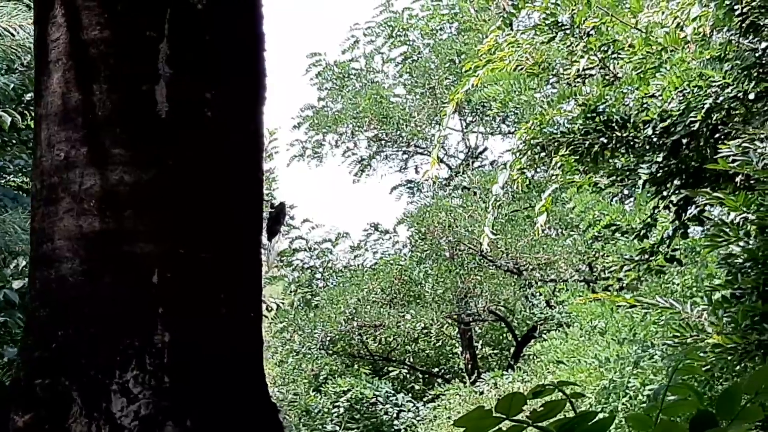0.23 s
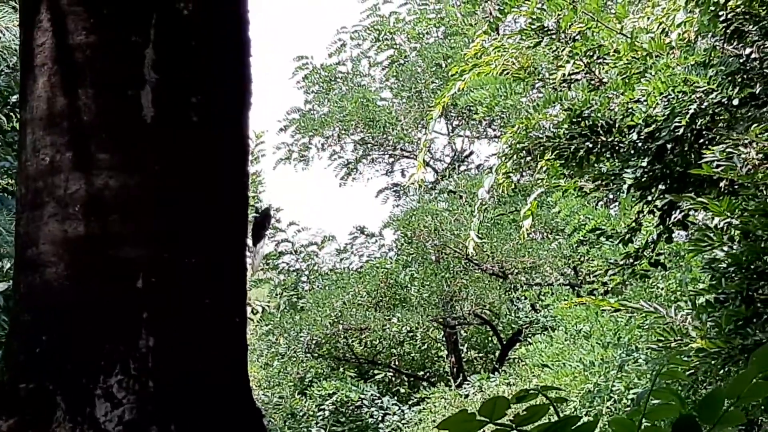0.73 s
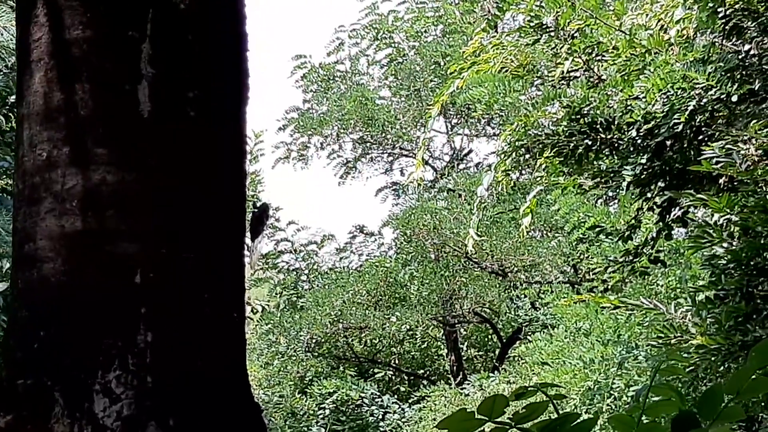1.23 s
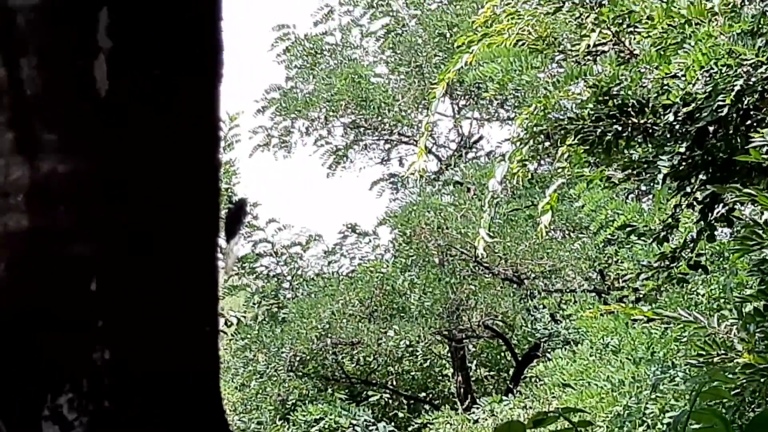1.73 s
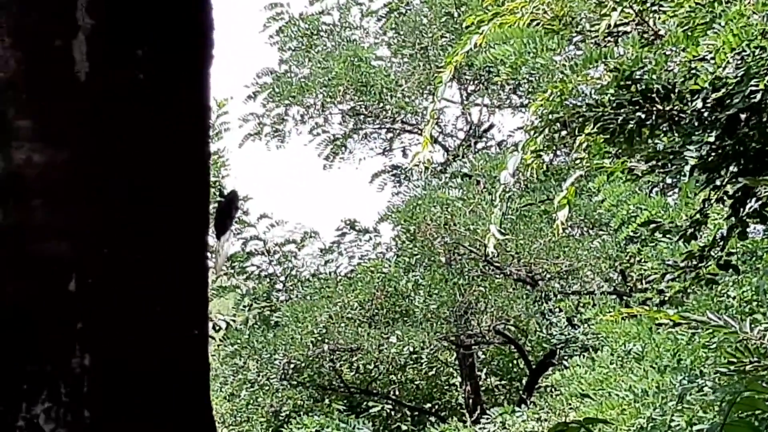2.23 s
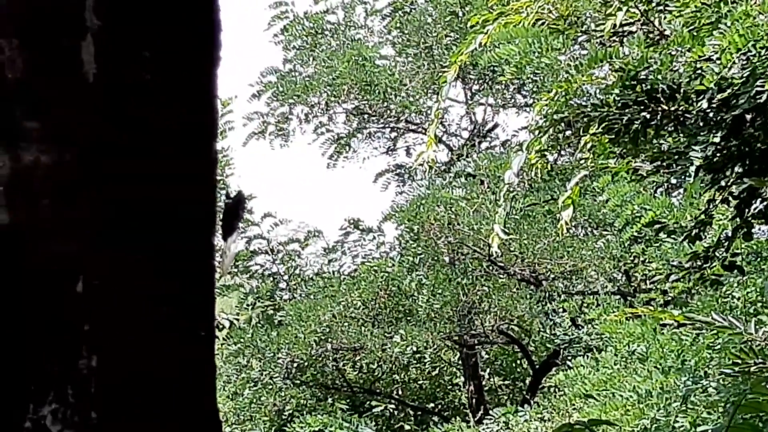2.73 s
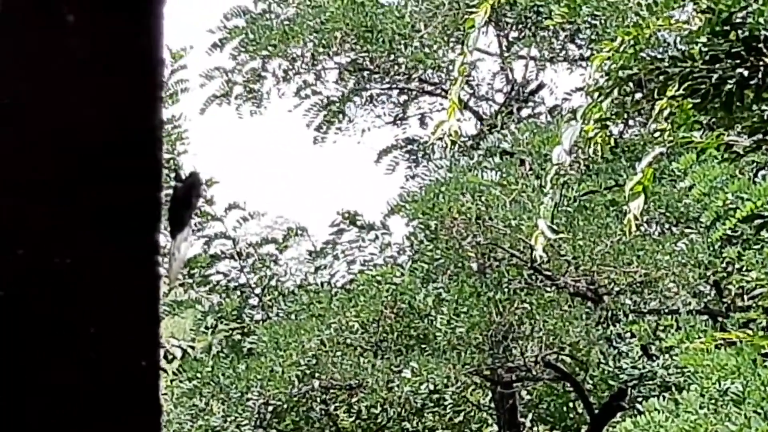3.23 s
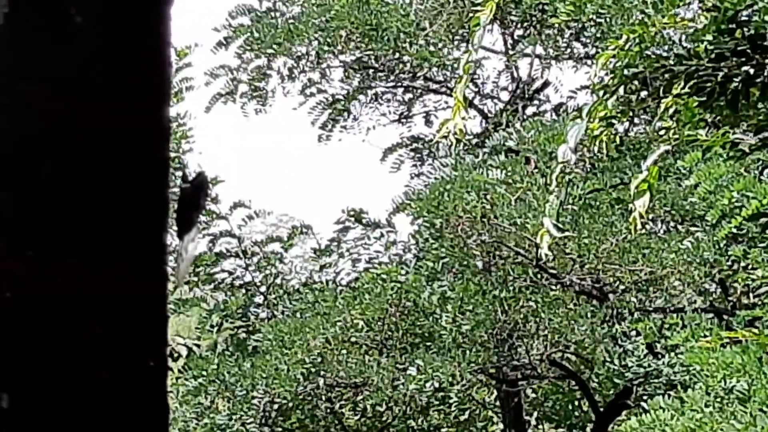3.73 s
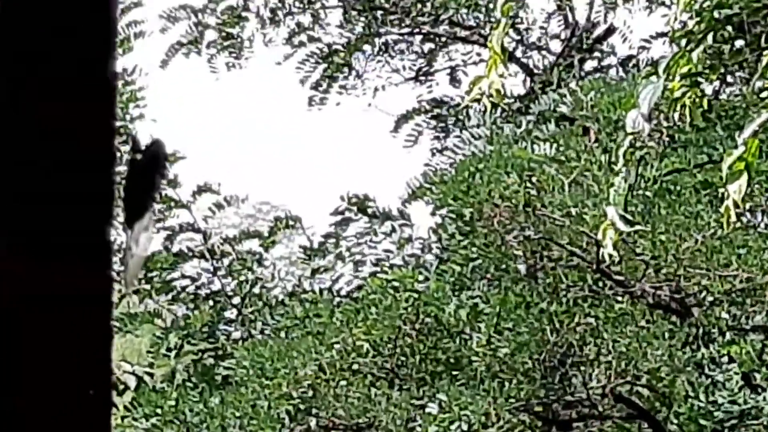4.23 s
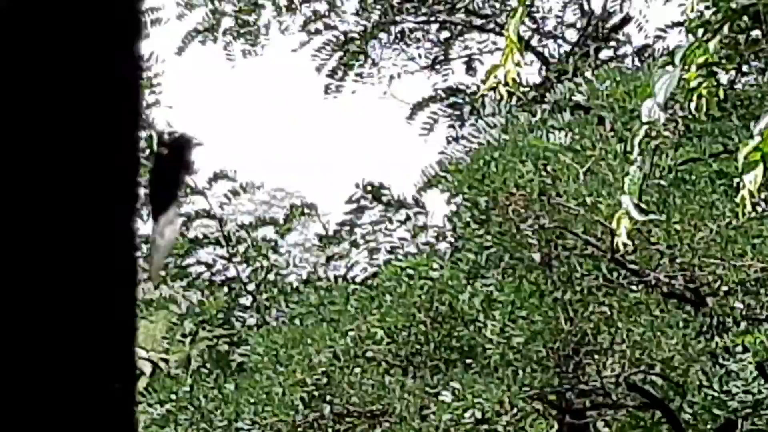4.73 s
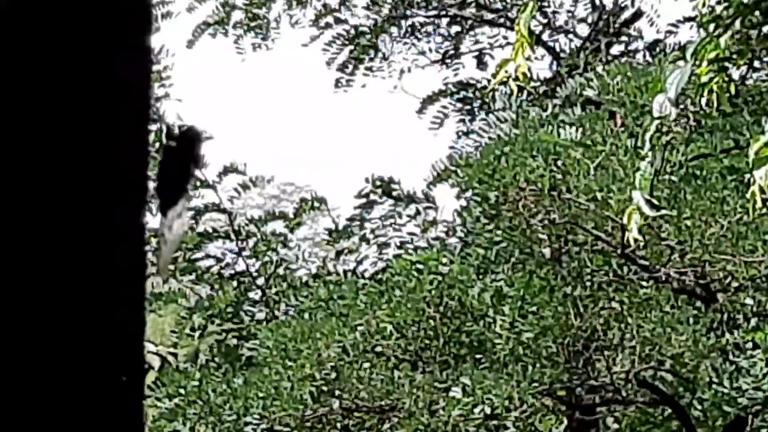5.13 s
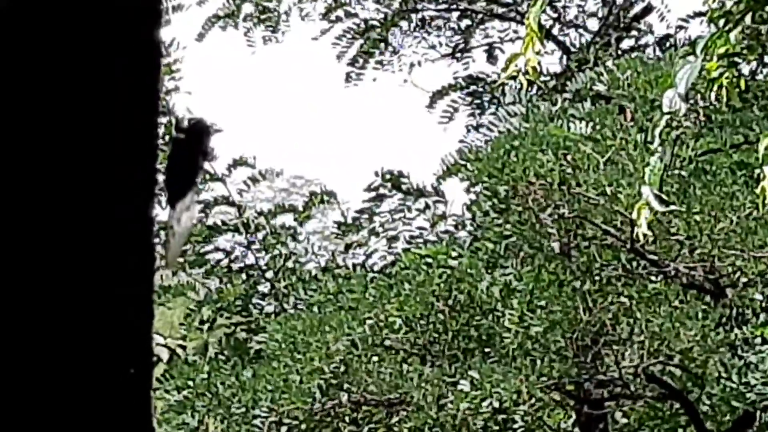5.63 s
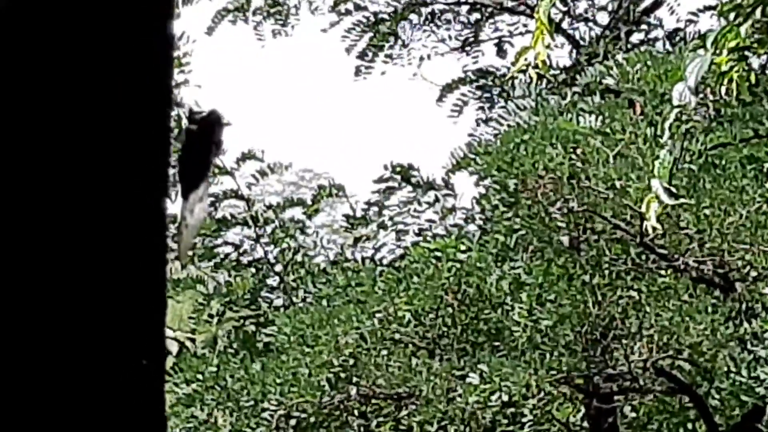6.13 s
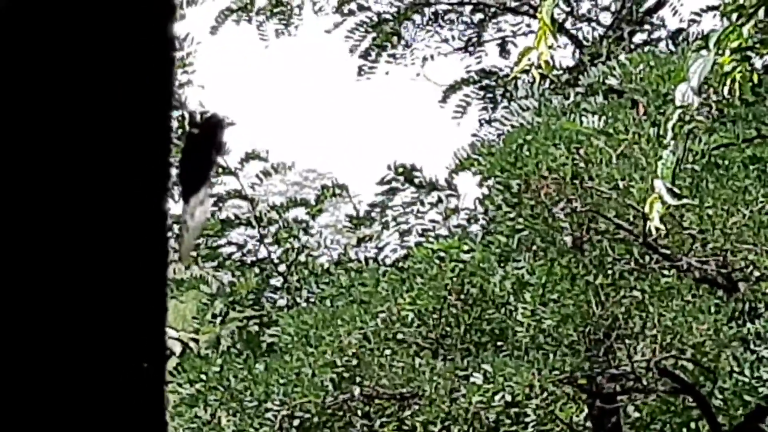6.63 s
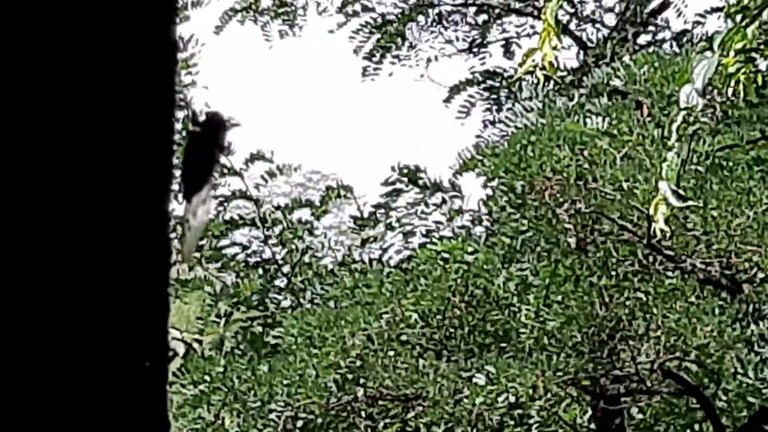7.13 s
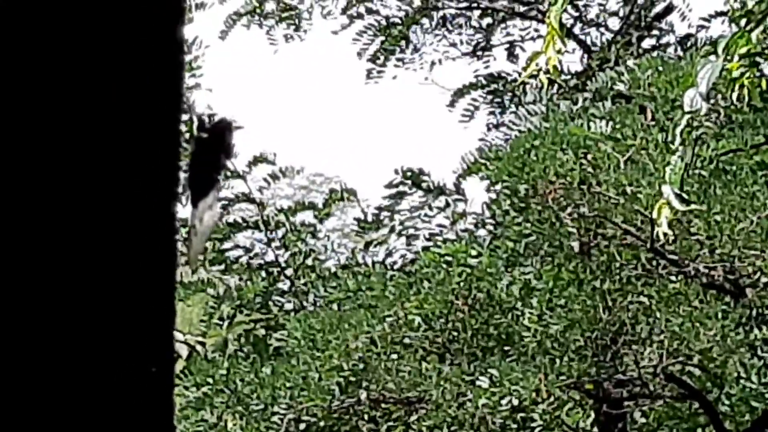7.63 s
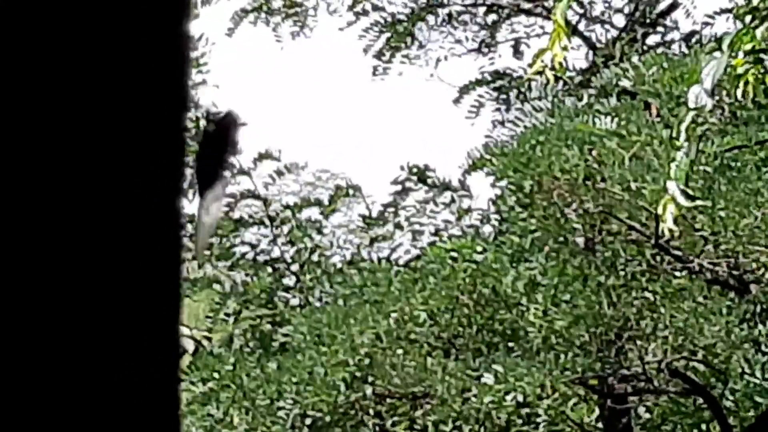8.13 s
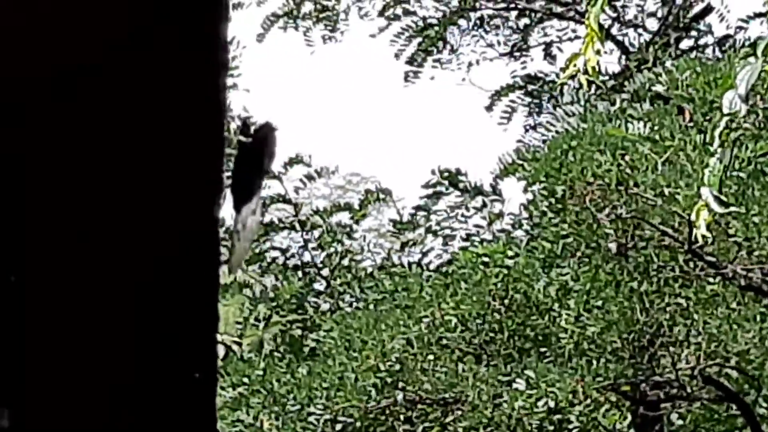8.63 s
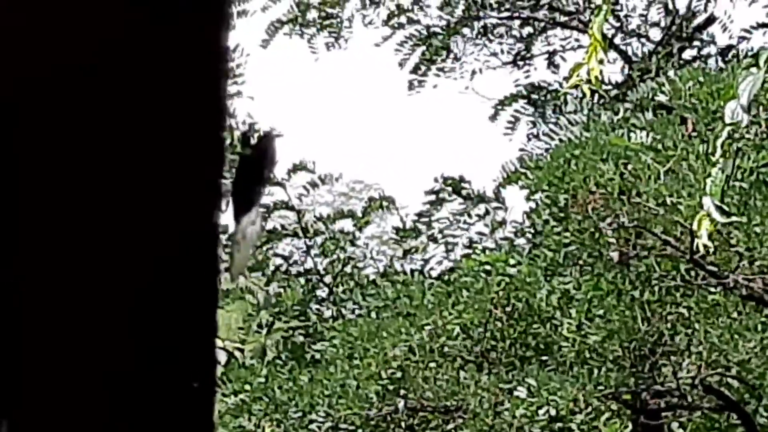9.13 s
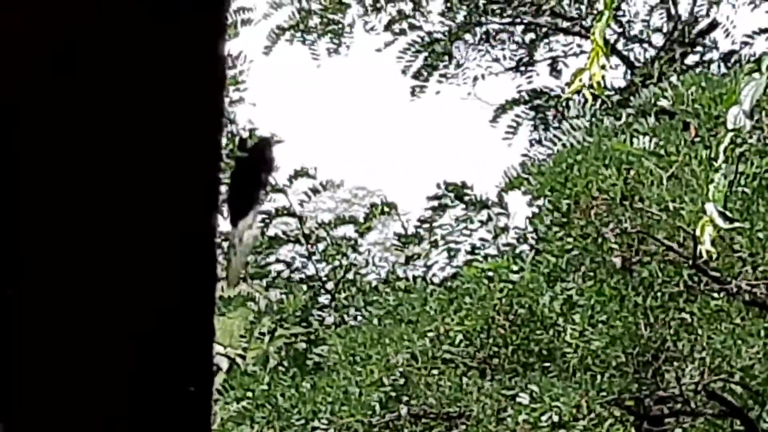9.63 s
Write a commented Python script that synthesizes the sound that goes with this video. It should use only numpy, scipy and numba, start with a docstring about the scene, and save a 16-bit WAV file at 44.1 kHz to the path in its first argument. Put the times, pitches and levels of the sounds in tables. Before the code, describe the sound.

Loud rhythmic cicada song from left, right and between, each pulse a hiss rising into a ringing buzz, over a grainy far chorus and faint rumble.

```python
"""Three cicadas sing 'min-min' close to the microphone: one left, one right, a fainter one between.
Each tymbal cycle clicks a few ribs; a shrill hiss builds, then the belly lifts and a lower ring swells.
Phrases of the left and right singers end in a slowing drawl, its clicks drifting apart.
Behind lie a far chorus of blurred clicks and noise, a faint rising bird call made of ringing noise,
town rumble of filtered noise, and a few soft low sine tones."""
import sys
import numpy as np
from scipy import signal
from scipy.fft import rfft, irfft
from scipy.io import wavfile
from scipy.ndimage import uniform_filter1d
from numba import njit

SR = 44100
rng = np.random.default_rng(int(sys.argv[2]) if len(sys.argv) > 2 else 0)


def amplitude_ratio(level_db):
    """Convert a level in decibels to the matching linear amplitude (field) ratio."""
    exponent = np.asarray(level_db, float) / 20
    return 10 ** exponent


def put_to_file(sound):
    """Save the sound as 16-bit audio at rate SR, in the file named by the first command-line argument."""
    columns = np.atleast_2d(sound).T  # one column per channel
    safe = np.clip(columns, -1, 1)
    whole_steps = np.round(safe * 32767)
    wavfile.write(sys.argv[1], SR, whole_steps.astype(np.int16))


N = 436590
T = np.arange(N) / SR

# syllables of the left singer: lift_s, ring_db, shrill_db (height of the build-up before it), cycle_hz
LEFT_SYLLABLES = [(1.213, -38, -43, 181.7), (1.559, -36.5, -42, 175.7), (1.949, -31.5, -40.5, 181),
                  (2.363, -31.5, -41, 182.1), (2.763, -30, -37, 184), (3.163, -29, -34.5, 184.7),
                  (3.55, -28.5, -32.5, 184.2), (3.948, -29.5, -32.5, 185.8), (4.316, -29, -30.5, 182.4),
                  (4.69, -33.5, -33, 179.3), (8.198, -33, -61, 179), (8.631, -29, -50, 184.5),
                  (9.017, -28, -40.5, 183.7), (9.395, -29, -34, 183.6), (9.755, -27.5, -30.5, 185.6)]
# slowing ends of its phrases: start_s, length_s, first_cycle_hz, last_cycle_hz, ring_db (at the start)
LEFT_DRAWLS = [(4.861, 1.5, 168.3, 79.96, -40.5)]
# shrill spectrum of the left and middle singers: frequency_hz, relative_db_per_hz
SHRILL = [(8000, -38), (9200, -31), (10500, -24), (11900, -9), (13000, -1.5), (13600, 0), (14600, -2),
          (15700, -1)]


def left_cicada():
    """The close singer on the left, with even clicks and its shrill well to the side."""
    low, high = cicada(LEFT_SYLLABLES, LEFT_DRAWLS, SHRILL, belly=.99, lift_s=.145, bend_depth=.22,
                       slip_us=.62, weak_slip_us=12.9, scatter_db=.89, late=.024)
    low = ports(low, lag=-11, pan_db=1.5, scatter_db=-2.5, t60=.037)
    return low + ports(high, lag=-11, pan_db=7.5, scatter_db=6, t60=.036, turns_hz=1.3)


# syllables of the right singer: lift_s, ring_db, shrill_db (height of the build-up before it), cycle_hz
RIGHT_SYLLABLES = [(0.227, -34, -47.5, 179), (0.745, -33, -44, 175.4), (1.278, -33.5, -47, 183),
                   (1.784, -35, -44, 182), (5.349, -33, -46, 175.9), (5.846, -30, -40, 182.1),
                   (6.344, -31.5, -40, 177.8), (6.871, -29, -43.5, 184), (7.365, -28, -45.5, 182.7),
                   (7.841, -28.5, -43.5, 178.3)]
# slowing ends of its phrases: start_s, length_s, first_cycle_hz, last_cycle_hz, ring_db (at the start)
RIGHT_DRAWLS = [(1.93, 1.87, 181.7, 83.04, -39), (7.99, 1.9, 175.3, 70.74, -36.5)]
# its shrill spectrum: frequency_hz, relative_db_per_hz
RIGHT_SHRILL = [(8000, -36), (9200, -25), (10100, -15), (10900, -7), (12100, -8), (13200, 0), (14300, -2),
                (15700, -2)]


def right_cicada():
    """The close singer on the right, with looser clicks and a higher belly pitch."""
    low, high = cicada(RIGHT_SYLLABLES, RIGHT_DRAWLS, RIGHT_SHRILL, belly=1.03, lift_s=.14, bend_depth=.75,
                       slip_us=6.8, weak_slip_us=7.7, scatter_db=1.34, late=.015)
    low = ports(low, lag=20, pan_db=-4, scatter_db=-5.5, t60=.042)
    return low + ports(high, lag=20, pan_db=.5, scatter_db=0, t60=.035, turns_hz=1.3)


# syllables of the middle singer: lift_s, ring_db, shrill_db (height of the build-up before it), cycle_hz
MIDDLE_SYLLABLES = [(0.01, -39, -53, 181.2), (0.465, -35, -48, 180.8), (0.917, -33, -41, 178),
                    (1.37, -37, -39, 176.5), (5.021, -47, -38, 177.7), (5.43, -35.5, -33.5, 179.8),
                    (5.87, -34.5, -38.5, 177.8), (6.282, -33, -44, 183.4), (6.7, -34, -37.5, 180.8),
                    (7.087, -36, -37.5, 176), (7.47, -49, -38, 177)]


def middle_cicada():
    """The fainter singer between them, heard mostly as scattered sound."""
    low, high = cicada(MIDDLE_SYLLABLES, [], SHRILL, belly=.99, lift_s=.12, bend_depth=.8,
                       slip_us=5.3, weak_slip_us=4.9, scatter_db=1.3, late=.017)
    low = ports(low, lag=5, pan_db=.2, scatter_db=16, t60=.055)
    return low + ports(high, lag=5, pan_db=1, scatter_db=13, t60=.054, turns_hz=1.1)


# one belly lift: share of lift_s, ring_hz (before each singer's belly factor), relative_db,
# cycle_bend_percent (before each singer's bend depth)
LIFT = [(0, 3400, -11, -.6), (.1, 3900, -3, .6), (.28, 4700, 0, 1.4), (.55, 4900, -.5, .7),
        (.85, 4550, -3, -1), (1.05, 4000, -7, -2.2), (1.4, 3500, -13, -2.7), (2.1, 3200, -22, -2.3)]
# the shrill build-up between lifts: share of the gap, relative_db
BUILD = [(0, -18), (.15, -11), (.36, -3), (.62, 0), (.87, -1), (1, -6)]


def cicada(syllables, drawls, shrill_colour, belly, lift_s, bend_depth, slip_us, weak_slip_us,
           scatter_db, late):
    """One singer: lifts sweep the belly ring and bend the cycle, the shrill band sounds between them."""
    rest_hz, longest_build_s, shrill_stop_s = 4700, .45, .045
    drawl_ease, drawl_fade_db, drawl_slip_us = 1.7, -6, 45
    ring_gain, shrill_gain = np.zeros(N), np.zeros(N)
    belly_hz = np.full(N, 1. * rest_hz)
    last, knots = -1., []
    share, lift_hz, lift_db, lift_bend = np.transpose(LIFT)
    part, build_db = np.transpose(BUILD)
    for s, ring_db, shrill_db, hz in syllables:
        lift_times = s + share * lift_s
        on = (T >= s - .01) & (T < lift_times[-1])
        ring_gain[on] = amplitude_ratio(ring_db + np.interp(T[on], lift_times, lift_db))
        belly_hz[on] = np.interp(T[on], lift_times, lift_hz)
        # the cycle sags through the lift and recovers before the next
        knots += zip(lift_times, hz * (1 + bend_depth * lift_bend / 100))
        gap = min(s - last, longest_build_s)
        times = [*(s - gap + part * gap), s + shrill_stop_s]
        build = np.interp(T, times, [*build_db, -20], left=-80, right=-80)
        shrill_gain += amplitude_ratio(shrill_db + build)
        last = s + .6 * lift_s
    # weak effort and a slowing cycle make the ribs buckle less evenly
    effort = np.maximum(ring_gain / ring_gain.max(), shrill_gain / shrill_gain.max())
    slip_us = slip_us + weak_slip_us * (1 - effort) ** 2
    cycle_hz = np.interp(T, *np.transpose(sorted(knots)))
    for s, length, first_hz, last_hz, db in drawls:
        on = (T > s) & (T < s + length)
        done = (T[on] - s) / length
        # the cycle slows fast at first, then settles; the ring dies late
        cycle_hz[on] = last_hz + (first_hz - last_hz) * (1 - done) ** drawl_ease
        slip_us[on] = drawl_slip_us
        ring_gain[on] = np.maximum(ring_gain[on], amplitude_ratio(db + drawl_fade_db * done ** 2))
        belly_hz[on] = rest_hz
    near, far = tymbals(uniform_filter1d(cycle_hz, size=600), slip_us, scatter_db, late)
    low = belly_ring(near + far, belly * uniform_filter1d(belly_hz, size=300))
    # the body screens the treble of the far tymbal
    high = colour(near + amplitude_ratio(-6) * far, shrill_colour)
    return uniform_filter1d(ring_gain, size=300) * low, shrill_gain * high


# steady rings beside the belly: ring_hz, width_hz, level_db
BODY = [(3656, 550, -9), (6606, 870, -13)]


def belly_ring(clicks, belly_hz):
    """Clicks excite two moving belly modes and steady body rings; so small a body sends out little bass."""
    low = ring(clicks, belly_hz, 750)
    low += amplitude_ratio(-1.5) * ring(clicks, 0.874 * belly_hz, 456)
    for hz, width, db in BODY:
        low += amplitude_ratio(db) * ring(clicks, hz, width)
    low = signal.sosfilt(signal.butter(4, 2850, "high", fs=SR, output="sos"), low)
    return unit(low_pass(low, 7500))


# rib clicks of both tymbals: share of cycle, level_db, looseness (times the basic slip in time)
RIBS = [(0, 0, 1), (.08, -11, 12), (.19, -14, 15), (.5, -2, 1), (.59, -12, 12), (.7, -15, 15)]


def tymbals(cycle_hz, slip_us, scatter_db, late):
    """Each cycle buckles the same ribs in order, with small slips in time and force; near and far tymbal."""
    phase = np.cumsum(cycle_hz) / SR
    share, db, loose = np.transpose(RIBS)
    second = share >= .5
    # the second tymbal comes a little after the half cycle
    turns = np.arange(int(phase[-1]) + 1)[:, None] + share + late * second
    time_chance, force_chance = rng.standard_normal((2, *turns.shape))
    at = np.interp(turns, phase, np.arange(N), right=N + 20)
    at += 1e-6 * SR * np.interp(turns, phase, slip_us) * loose * time_chance
    # each click is a windowed sinc, so it can fall between samples
    spots = np.floor(at).astype(int)[..., None] + np.arange(-7, 9)
    off = spots - at[..., None]
    click = np.sinc(off) * np.cos(np.pi * off / 16) ** 2
    click *= amplitude_ratio(db + scatter_db * force_chance)[..., None]
    spots = np.clip(spots, 0, N)
    pair = [np.bincount(spots[:, ribs].ravel(), click[:, ribs].ravel(), N + 1)[:N]
            for ribs in (~second, second)]
    return unit(np.array(pair))


# slow swell of the far chorus: time_s, ring_db
CHORUS_LEVEL = [(0, -36), (0.998, -35), (2.0, -33), (3.0, -34), (4.2, -34.5), (5.0, -32), (6.0, -34.5),
                (7.3, -34), (8.3, -33.5), (9.9, -34.5)]
# its ring spectrum: frequency_hz, relative_db_per_hz
CHORUS_RING = [(710, -75), (1200, -52), (2120, -27), (3200, -9.5), (4520, 1.5), (4820, -2), (5440, -11),
               (6820, -12.5), (7330, -30.5), (7690, -45), (7880, -25), (8200, -72), (10700, -101),
               (18000, -120)]
# its shrill spectrum: frequency_hz, relative_db_per_hz
CHORUS_SHRILL = [(7000, -27), (8300, -21), (9100, -19), (10100, -16), (12100, -3.5), (13700, 5),
                 (15700, -6.5)]


def chorus():
    """Many far singers: close, drifting cycle rates and added noise blur into a grainy hiss."""
    drift = np.sin(T * rng.uniform(1, 2.5, (4, 1)) + rng.uniform(0, 2 * np.pi, (4, 1)))
    rates = np.array([[171], [175], [179], [182]]) + 2.5 * drift
    crowd = np.zeros((2, N))
    for cycle_hz in rates:
        singer = tymbals(cycle_hz, np.full(N, 15.), scatter_db=3, late=.02).sum(axis=0)
        crowd += ports(singer, lag=0, pan_db=0, scatter_db=9, t60=.12, turns_hz=1.5)
    crowd = unit(crowd) + 1.22 * rng.standard_normal((2, N))
    low = amplitude_ratio(np.interp(T, *np.transpose(CHORUS_LEVEL))) * colour(crowd, CHORUS_RING) * pan(0.4)
    return low + amplitude_ratio(-44.5) * colour(crowd, CHORUS_SHRILL) * pan(1.5)


# bird calls: middle_s, level_db
BIRD_CALLS = [(.46, -65.5), (1.49, -64), (2.42, -63), (3.35, -66.5), (4.18, -63), (5.05, -63), (5.83, -67),
              (6.21, -68), (6.55, -64), (7.25, -62), (8.27, -68), (8.59, -68), (9.36, -65.5)]


def bird():
    """A husky note gliding upward, far away: noise through a rising resonance."""
    hz, level = np.full(N, 1500.), np.zeros(N)
    for s, db in BIRD_CALLS:
        on = abs(T - s) < .1
        hz[on] = 1700 + 2200 * (T[on] - s)
        level[on] = amplitude_ratio(db) * np.cos(np.pi * (T[on] - s) / .2)
    husky = unit(ring(rng.standard_normal(N), hz, 260))
    return ports(level * husky, lag=0, pan_db=0, scatter_db=4, t60=.12)


# rumble spectrum: frequency_hz, relative_db_per_hz
TOWN_SPECTRUM = [(15, -37), (25, -14), (48, -6.5), (103, -2.5), (243, -1), (352, -6.5), (603, -9.5),
                 (919, -14.5), (1160, -20.5), (1400, -19.5), (1820, -18), (3080, -120)]
# rumble level: time_s, level_db
TOWN_LEVEL = [(0, -53), (7.6, -54), (9.9, -50)]
# likeness of the two ports: frequency_hz, left-right correlation
TOWN_ALIKE = [(60, 0.99), (130, 0.92), (290, 0.83), (640, -0.15), (1400, -0.55)]


def town():
    """Traffic rumble: filtered noise, alike at both ports in the bass."""
    alike = np.clip(on_hz(TOWN_ALIKE), -1, 1)
    mid, side = rfft(rng.standard_normal((2, N))) * np.sqrt([1 + alike, 1 - alike])
    rumble = colour(irfft([mid + side, mid - side], N), TOWN_SPECTRUM)
    return amplitude_ratio(np.interp(T, *np.transpose(TOWN_LEVEL))) * rumble


# soft low thuds, perhaps the hand on the recorder: start_s, pitch_hz, level_db
THUDS = [(1.53, 55, -57), (3.22, 55, -60), (7.12, 63, -58)]


def thuds():
    """Short low sine swells."""
    return sum(swell(s, .15, hz, db) for s, hz, db in THUDS)


# a faint far tone, perhaps a horn: start_s, length_s, pitch_hz, level_db
FAR_TONE = (5.85, .25, 406, -67)


def far_tone():
    """One faint sine swell."""
    return swell(*FAR_TONE)


def swell(start, length, hz, db):
    """A soft sine tone that swells and fades over half a sine."""
    envelope = np.sin(np.pi * np.clip((T - start) / length, 0, 1))
    return amplitude_ratio(db) * np.sqrt(2) * envelope * np.sin(2 * np.pi * hz * T)


def ports(x, lag, pan_db, scatter_db, t60, turns_hz=0.3904):
    """Direct sound (left port late by lag samples) plus scatter off bark and leaves, unlike at each port."""
    tail = rng.standard_normal((2, 2, 4000)) * np.exp(-np.log(1000) * np.arange(4000) / SR / t60)
    tail *= amplitude_ratio(scatter_db) / np.sqrt(np.sum(tail ** 2, axis=2, keepdims=True))
    # two random scatter patterns take turns at turns_hz, so the echo colour keeps changing
    turn = 2 * np.pi * turns_hz * T
    scatter = np.zeros((2, N))
    for weight, pattern in zip((np.cos(turn), np.sin(turn)), tail):
        scatter += signal.oaconvolve((weight * x)[None], pattern, axes=1)[:, :N]
    direct = np.array([np.roll(x, max(lag, 0)), np.roll(x, max(-lag, 0))])
    return pan(pan_db) / np.sqrt(1 + amplitude_ratio(2 * scatter_db)) * (direct + scatter)


def pan(db):
    """Left and right gains for a left minus right difference."""
    return amplitude_ratio(np.array([[db], [-db]]) / 2)


@njit
def svf(x, hz, width):
    """State-variable band-pass with a moving centre."""
    y, b, l = np.empty(len(x)), 0., 0.
    for i in range(len(x)):
        g, k = np.tan(np.pi * hz[i] / SR), width / hz[i]
        v = (b + g * (x[i] - l)) / (1 + g * (g + k))
        b, l, y[i] = 2 * v - b, l + 2 * g * v, k * v
    return y


def ring(x, hz, width):
    """A steep resonance: the band-pass twice."""
    hz = hz + np.zeros(N)
    return svf(svf(x, hz, 1. * width), hz, 1. * width)


def unit(x):
    """Scale to rms 1."""
    return x / np.sqrt(np.mean(x ** 2))


def on_hz(table):
    """A (Hz, value) table read at every FFT bin, along log frequency."""
    hz, value = np.transpose(table)
    return np.interp(np.log(np.fft.rfftfreq(N, 1 / SR) + 1), np.log(hz), value)


def colour(x, table):
    """Give a flat sound a spectrum, at rms 1."""
    return unit(irfft(rfft(x) * amplitude_ratio(on_hz(table)), N))


def low_pass(x, hz):
    """Steep elliptic cut above hz."""
    return signal.sosfilt(signal.ellip(8, .2, 70, hz, fs=SR, output="sos"), x)


def scene():
    """Three near singers over the far sounds."""
    singers = left_cicada() + middle_cicada() + right_cicada()
    return singers + chorus() + bird() + town() + thuds() + far_tone()


def top_cut(x):
    """Nothing passes above the cut-off."""
    return signal.sosfilt(signal.butter(12, 16990, fs=SR, output="sos"), x)


def record(dry):
    """Steep cut of the finished mix above 15.8 kHz."""
    mix = low_pass(dry, 15770)
    return top_cut(mix)


dry = scene()
out = record(dry)
put_to_file(out)
```